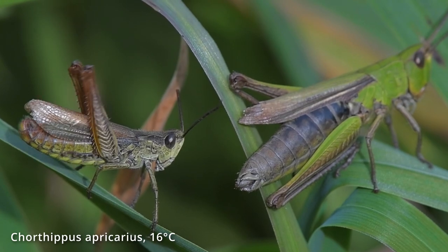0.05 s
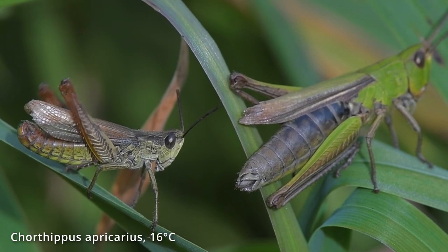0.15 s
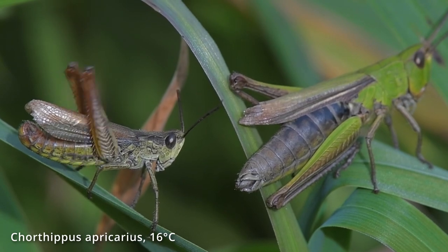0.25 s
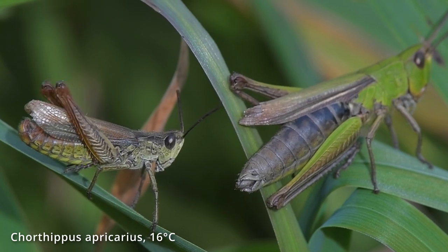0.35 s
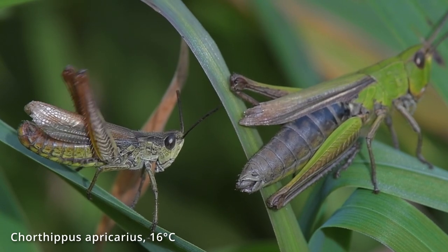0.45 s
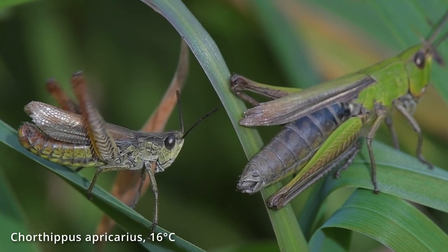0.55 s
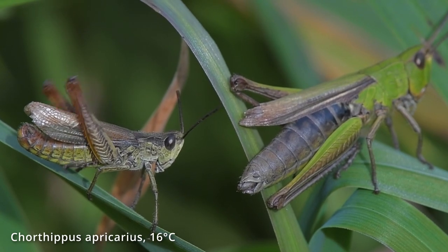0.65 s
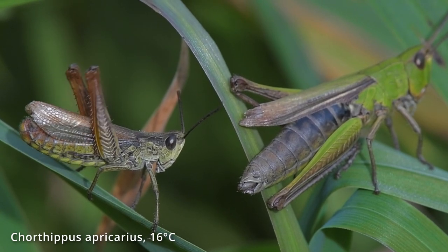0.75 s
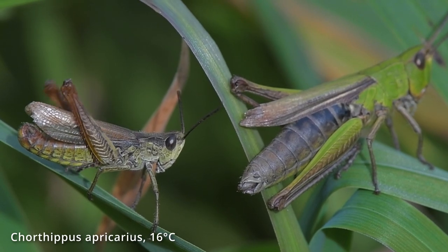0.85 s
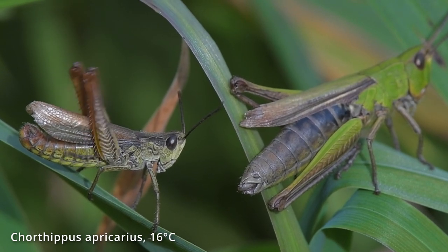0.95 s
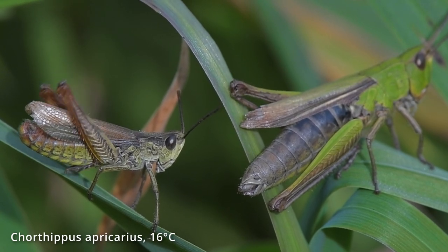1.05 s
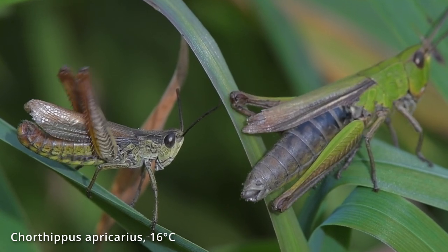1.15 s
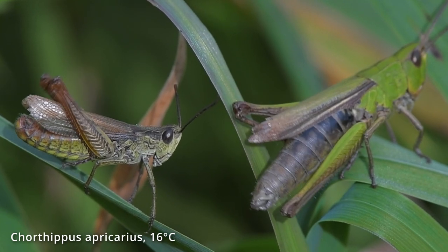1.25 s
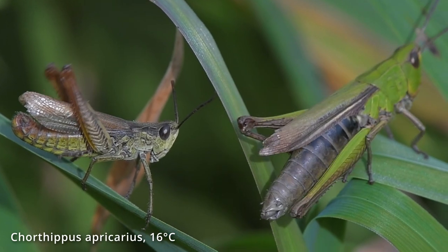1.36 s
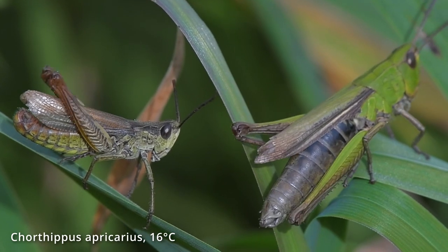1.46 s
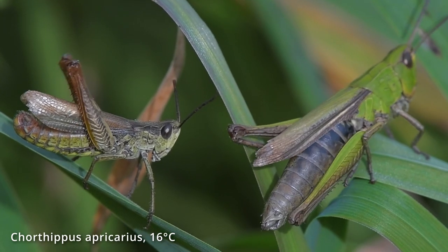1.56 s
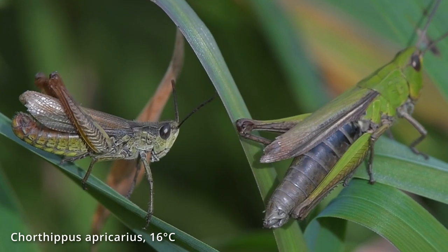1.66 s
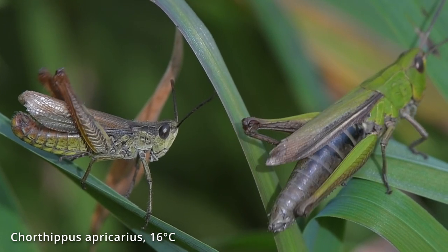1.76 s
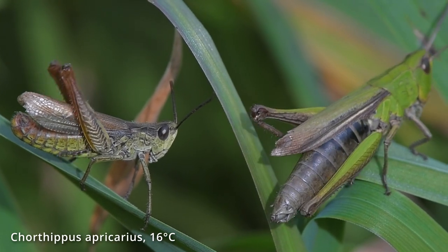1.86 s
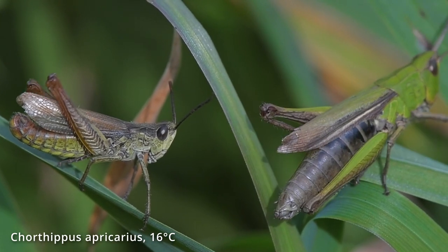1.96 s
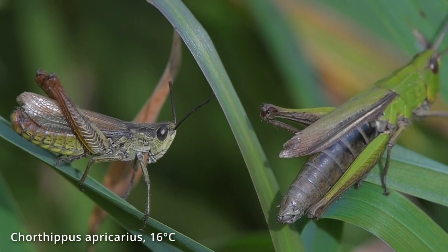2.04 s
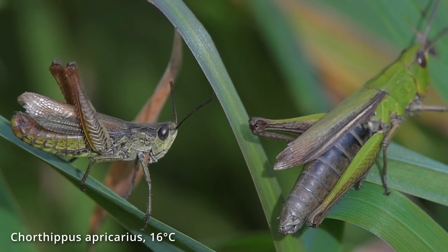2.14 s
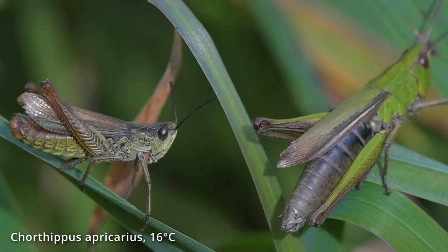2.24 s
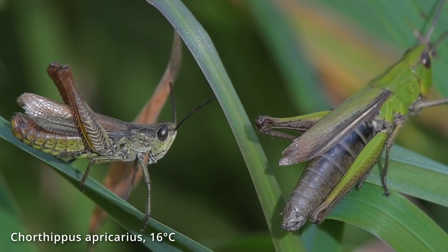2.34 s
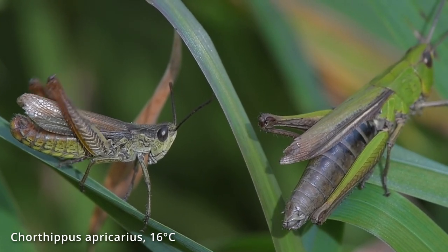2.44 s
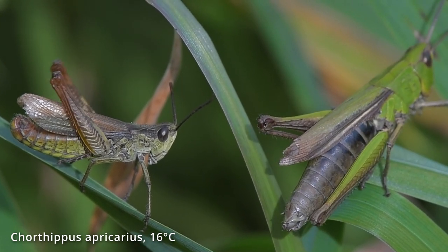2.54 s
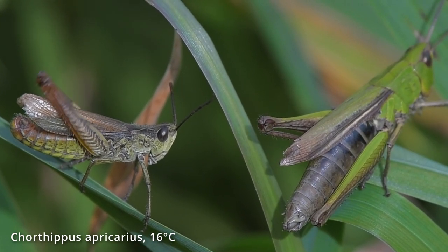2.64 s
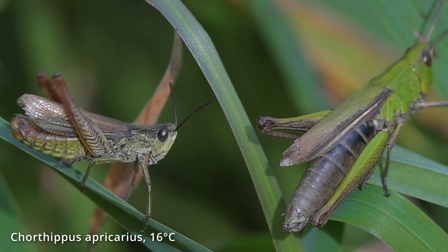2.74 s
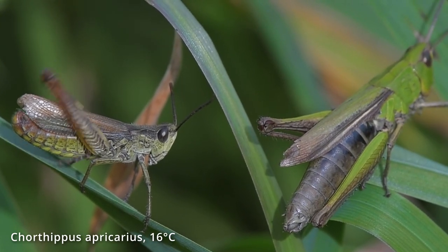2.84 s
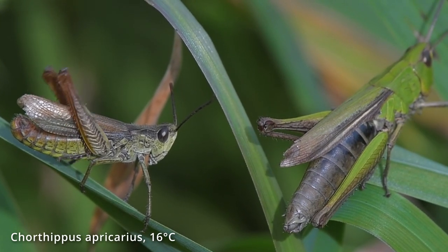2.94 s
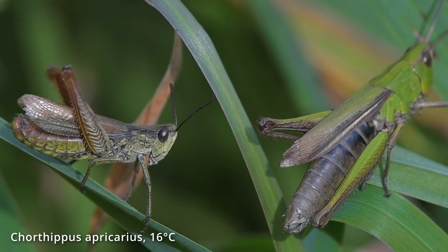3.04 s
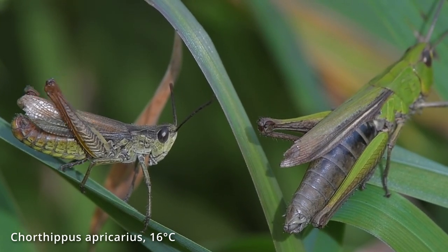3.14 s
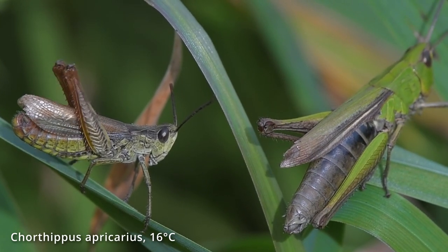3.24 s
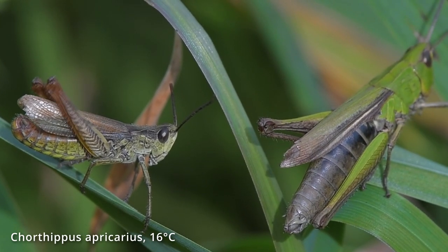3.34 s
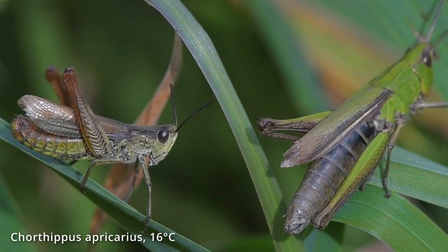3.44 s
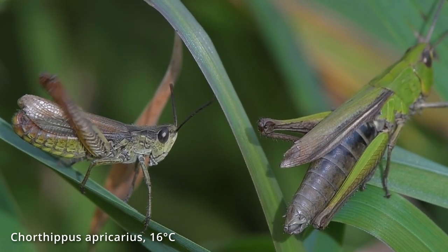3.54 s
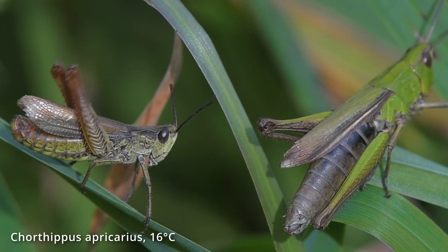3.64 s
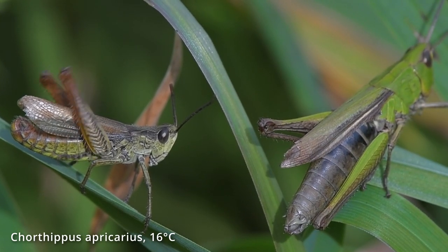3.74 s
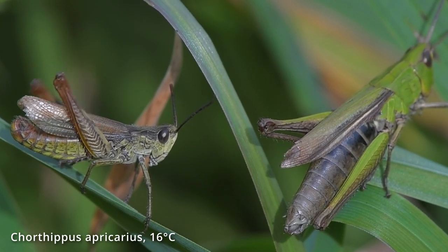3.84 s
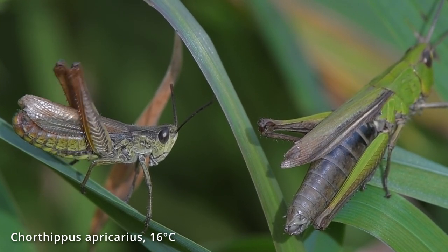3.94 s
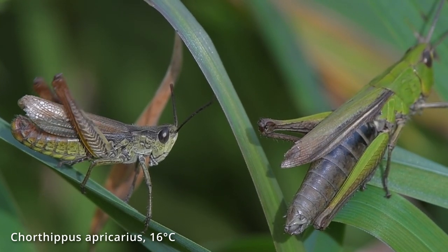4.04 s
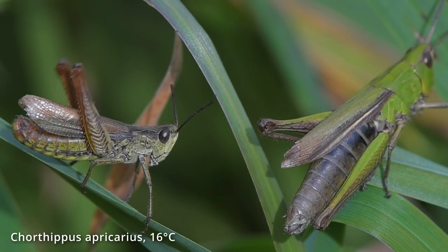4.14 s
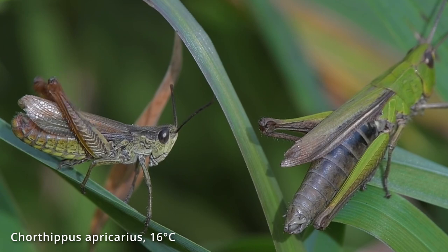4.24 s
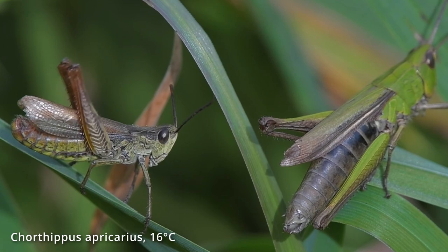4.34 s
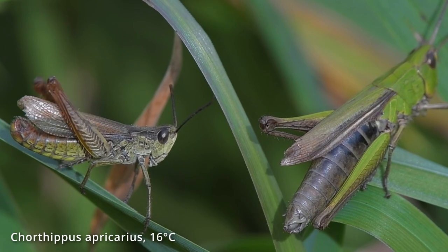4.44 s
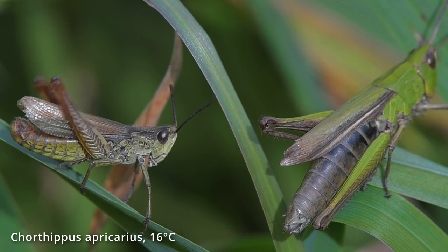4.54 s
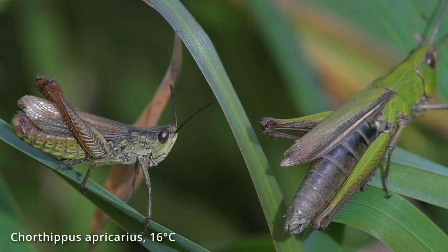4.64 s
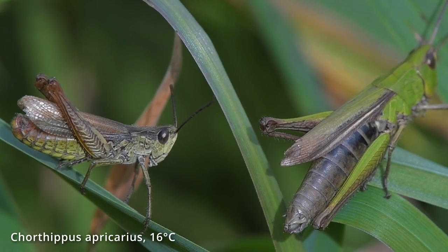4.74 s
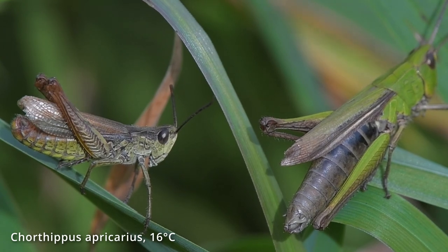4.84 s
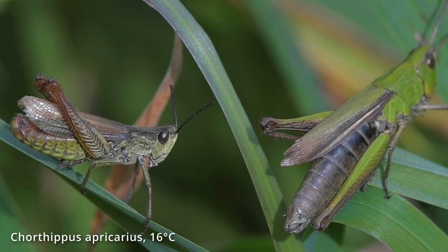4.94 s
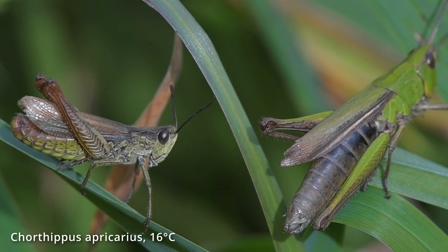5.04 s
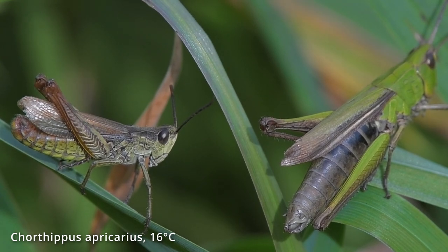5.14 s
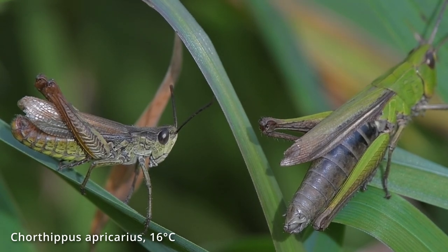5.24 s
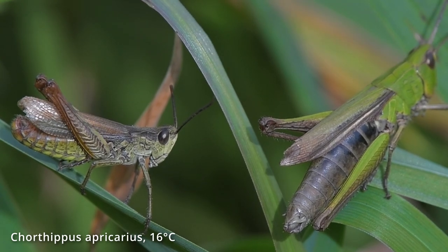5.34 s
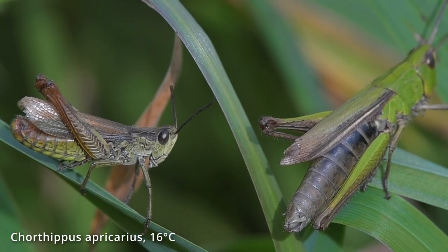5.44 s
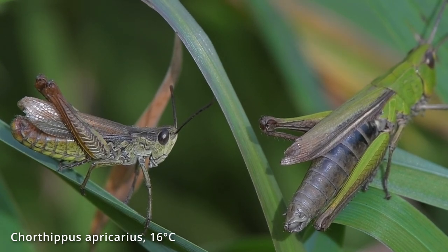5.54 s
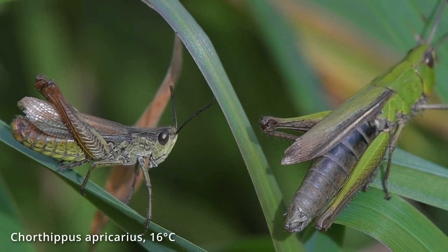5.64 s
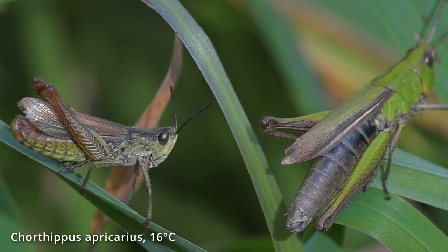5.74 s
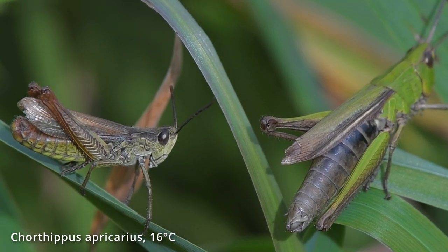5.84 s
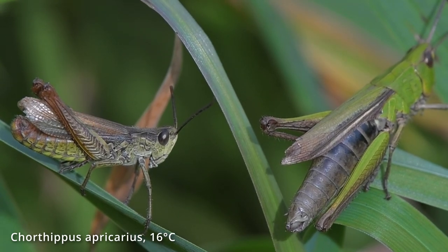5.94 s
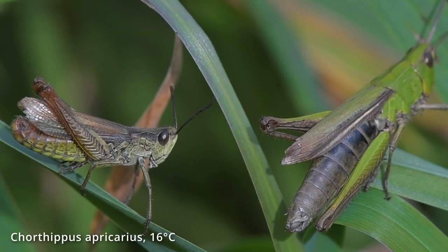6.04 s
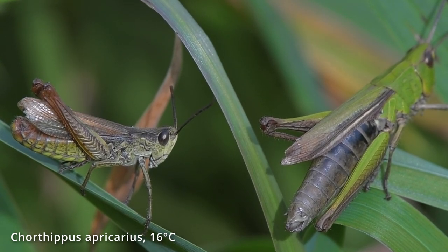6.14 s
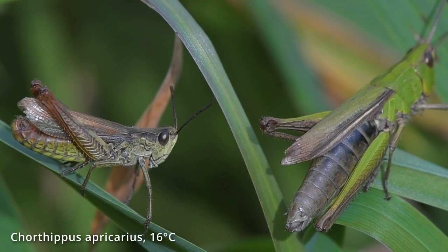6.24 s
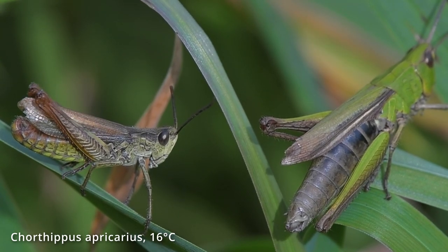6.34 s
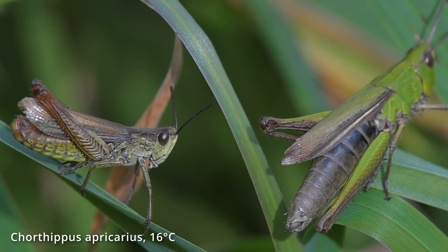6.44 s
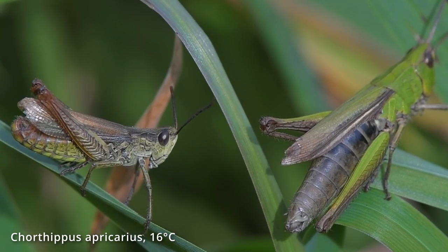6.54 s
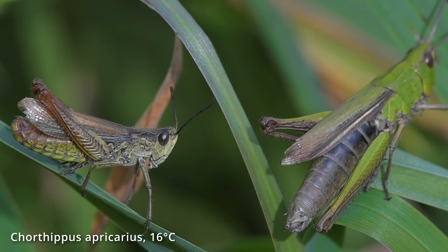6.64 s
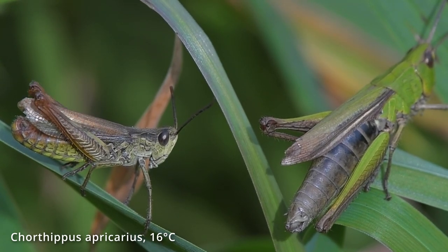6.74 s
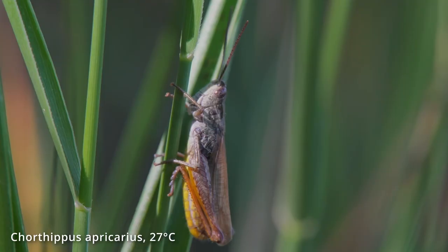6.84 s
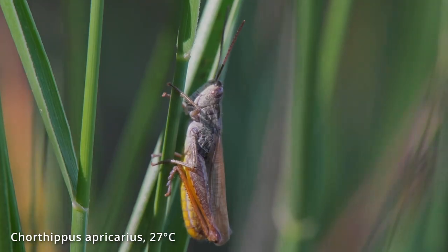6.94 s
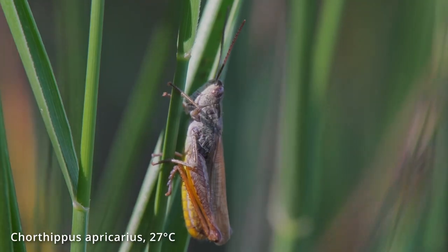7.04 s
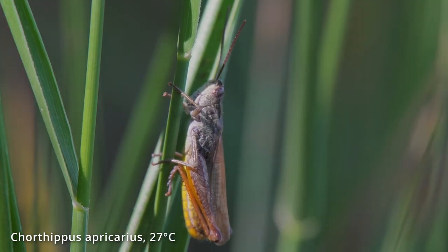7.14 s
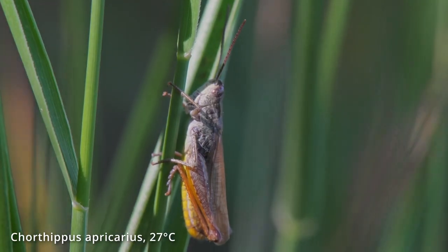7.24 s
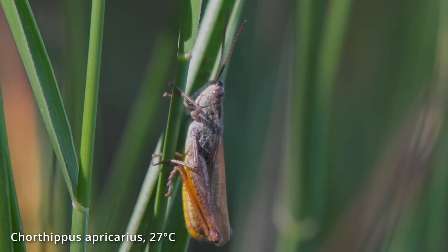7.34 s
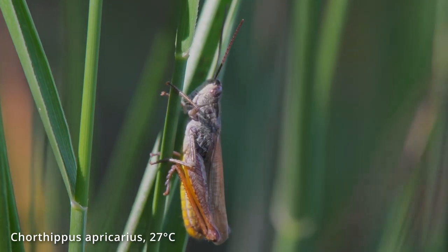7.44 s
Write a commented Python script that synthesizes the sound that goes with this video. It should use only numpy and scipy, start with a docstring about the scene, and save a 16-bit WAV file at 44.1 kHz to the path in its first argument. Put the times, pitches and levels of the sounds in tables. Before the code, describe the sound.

A grasshopper sings close to the microphone in a quiet meadow, rubbing its legs on its wings in a run of dry, high rasps, about three a second. After some four seconds the song ends in a brief scuffle of ticks on stems, followed by a few tiny rustles. Distant birds wheeze, chirp and twitter over a soft hush and a barely audible fly. Faint wind rumbles late, then the background turns quieter and hissier.

```python
"""A meadow, with a grasshopper singing close by: the peg rows of its hind legs rasp up and down the
wing veins and set the wings ringing. The song ends in a scuffle, with knocks on stems and rustles of
legs on grass. Behind it lie a soft hush, a fly's faint hum and far birds that wheeze, whistle, chirp
and twitter. Wind rumbles in late; near the end the background cuts to a quieter, hissier spot."""
import sys
import numpy as np
from scipy import signal
from scipy.fft import rfft, irfft, next_fast_len
from scipy.io import wavfile

SR = 44100
rng = np.random.default_rng(int(sys.argv[2]) if len(sys.argv) > 2 else 0)


def file_out(sig):
    """Save sig as 16-bit WAV at sys.argv[1]."""
    # one column per channel
    cols = np.atleast_2d(sig).T
    # limit, then scale
    lim = np.clip(cols, -1, 1)
    pcm = np.round(lim * 32767).astype(np.int16)
    wavfile.write(sys.argv[1], SR, pcm)


N = 330309
T = np.arange(N) / SR
CUT_S = 6.882

# Resonances of wing ring, body, lower and upper rasp: pitch_hz, width_hz, relative_db
RING_MODES = [(5960, 410, -11), (6740, 597, 6.5), (7640, 610, 4), (8390, 590, -6.5)]
BODY_MODES = [(4600, 430, -3), (5700, 670, 5)]
LOWER_RASP_MODES = [(8470, 946, 0.16), (9750, 300, 2.1), (10790, 890, -4)]
UPPER_RASP_MODES = [(12210, 2050, 2.24), (13200, 2140, 2.2), (14910, 860, 2)]
# Faster strokes are louder: rasp_db, pegs_per_s
PEG_RATES = [(-60, 450), (-44.5, 1000), (-25, 2200)]

# The song runs lift, sweep, lift, press, snap. Level triples are offsets at a stroke's start, turn and
# end. Tilt is lower rasp over upper rasp; its pairs are start and end.
# Lifts, the leg swings up, swelling and brightening: start_s, rise_ms, fall_ms, rasp_db, ring_db
LIFTS = [(0.1598, 20.9, 7, -25.5, -49), (0.311, 23, 4.7, -25, -45), (0.5109, 17.7, 9.9, -29.5, -49.5),
         (0.664, 25.7, 4.2, -28, -44.5), (0.8629, 16.6, 9.2, -33, -45.5), (1.0224, 19.3, 6.5, -27, -43),
         (1.2043, 20.5, 7.5, -36.5, -54), (1.6242, 16.5, 12.4, -39.5, -59), (1.7721, 28.4, 9.4, -25.5, -56),
         (1.9492, 10.8, 12, -38.5, -57), (2.221, 26.9, 3, -45.5, -69), (2.443, 17, 7.7, -34.5, -63.5),
         (2.6026, 20.7, 3, -33.5, -58), (2.7557, 24.4, 10.2, -29, -53), (2.9788, 20.2, 2.45, -37.5, -56),
         (3.1237, 26.2, 6.4, -24, -57), (3.3298, 9.1, 15.2, -50, -54), (3.4794, 15.0, 11.9, -37, -52),
         (3.6929, 16.4, 7, -32, -51), (3.8443, 23.7, 9.2, -22, -45.5), (4.0438, 28.6, 1.47, -27, -55),
         (4.201, 20.3, 8, -23.5, -44.5), (4.5563, 18, 5.6, -27, -48.5)]
LIFT_START_DB, LIFT_START_SHARE, LIFT_END_DB = -47, .37, -6   # start = base + share of the peak
LIFT_RING_DB, LIFT_TILT_DB = (0, -5, -15), (5.5, -13.5)
# Sweeps, the leg comes slowly down, dulls and drags on:
# start_s, rise_ms, fall_ms, rasp_db, ring_delay_ms, ring_db, drag_db
SWEEPS = [(0.1927, 3.84, 68, -27, 12, -39, -50.5), (0.5437, 1.7, 65, -28.5, 6.2, -36, -46.5),
          (0.8976, 1.68, 62.5, -28.5, 5.55, -35.5, -50), (1.6577, 15.2, 36.7, -37, 22.4, -45, -59.5),
          (1.8252, 16.6, 27, -23, 13.3, -31.5, -63.5), (2.4789, 8.9, 50, -35.5, 35.4, -44, -64.5),
          (2.636, 16.9, 50, -31, 20.4, -38.5, -65), (3.0113, 12, 39, -41.5, 23.7, -44.5, -55.5),
          (3.3572, 4.7, 57, -38.5, 5.1, -39, -56), (3.728, 3, 59, -32, 27.4, -41, -53),
          (4.0818, 1.29, 56, -32.5, 15.9, -39.5, -53.5), (4.4463, 5.0, 48, -26, 9.7, -32.5, -59)]
SWEEP_START_DB, SWEEP_END_DB, SWEEP_RING_START_DB, SWEEP_TILT_DB = -7, -63.5, -10, (-9, 12)
# Presses, a bright even rub at the top of the swing: start_s, rise_ms, hold_ms, rasp_db
PRESSES = [(0.3449, 4.15, 22.9, -29), (0.7001, 2.94, 26.3, -30), (1.055, 3.7, 17.2, -31.5),
           (1.2399, 15, 9.8, -34.5), (1.814, 3.03, 7.7, -36.5), (1.978, 2.6, 16.6, -37.5),
           (2.2546, 10.7, 20, -38), (2.797, 9.1, 31.2, -33.5), (3.1654, 4.4, 23.8, -31),
           (3.511, 2.8, 33.3, -32), (3.8837, 7, 19.2, -29), (4.2373, 2.16, 29.4, -30.5),
           (4.5875, 8.9, 17.8, -31.5)]
PRESS_RASP_DB, PRESS_RING_DB, PRESS_TILT_DB = (-10.5, 0, -7), (-37, -39, -29), (-10.5, -9.5)
# Snaps, the leg slams down: start_s, hold_ms, start_rasp_db, turn_rasp_db, ring_db
SNAPS = [(0.024, 9.1, -17.5, -21.5, -18), (0.3792, 13.4, -16, -24, -25), (0.7332, 11, -19, -20.5, -18.5),
         (1.0824, 7.4, -19, -19.5, -25.5), (1.2884, 5.54, -25, -16.5, -22),
         (1.4966, 3.73, -33.5, -20.5, -22.5), (2.0933, 3.77, -22, -21, -21), (2.318, 6.7, -26, -21.5, -29),
         (2.847, 9.8, -26.5, -19, -26.5), (3.2011, 6.7, -21, -18, -26.5), (3.5558, 5.55, -20.5, -19.5, -18),
         (3.9204, 9.6, -19, -18, -20), (4.2765, 9, -18, -19.5, -21)]
SNAP_FALL_DB_PER_MS, SNAP_END_DB, SNAP_TILT_DB = 1.38, -57, (-2, .5)
SNAP_RING_START_DB, SNAP_RING_END_DB = -9.5, -54
# Stray rubs and the closing scuffle: start_s, rise_ms, fall_ms, rasp_db, ring_db, tilt_db
SCRAPES = [(0.0, 4, 5.3, -33, -45, -1), (0.01, 2.42, 1.6, -32, -46, -1.5),
           (1.266, 7.9, 10.3, -39.5, -51, -2), (1.46, 22, 8, -58, -56.5, 6),
           (2.0125, 1.82, 21, -45.5, -52, -2), (2.034, 6.9, 10.5, -49, -55, 1),
           (2.0538, 2.67, 3.5, -48, -50, 0), (2.0706, 3.76, 1.2, -51, -50, 10),
           (2.2904, 7.4, 1.9, -35, -51, -3), (2.304, 3.5, 8, -52, -70, -2.5),
           (3.1963, 1.2, 1.5, -30, -55, -3), (4.3436, 7.7, 8.1, -29.5, -24, 10),
           (4.364, 2.34, 18.6, -39, -36.5, 14), (4.387, 3.1, 11, -41.5, -43.5, 12.5),
           (4.4029, 1.5, 4, -38, -39, 12), (4.4088, 5.3, 25, -21, -39, 7.5),
           (4.4932, 1.28, 28, -43.5, -45.5, 9), (4.527, 3.8, 25, -57, -55, 12),
           (4.6199, 1.45, 17, -36.5, -46.5, -2)]
SCRAPE_RASP_DB, SCRAPE_RING_DB = (-6, 0, -7), (-8.5, 1.5, -3)

# Colour of the meadow hush: frequency_hz, relative_db
MEADOW_COLOUR = [(15, -59.5), (25, -27.5), (87, -13), (170, -10.5), (206, -3.5), (263, -9), (440, -3.5),
                 (520, -8), (1000, -10.5), (1900, -16.5), (3300, -17.5), (5000, -20.5), (8000, -20),
                 (16000, -19.5)]
# Its stereo width: frequency_hz, side_over_mid_db
MEADOW_WIDTH = [(60, -5), (180, -13.5), (550, -15.5), (1650, -12), (4970, -4.5), (15000, 2)]
# Its slow swell: time_s, gain_db
MEADOW_SWELL = [(0.0, -1), (6.88, 0.5)]
# A fly on the wing: time_s, pitch_hz, level_db
FLY_PATH = [(0, 410, -82.5), (1.1, 413.4, -78), (1.4, 405, -83.5), (2.4, 410.6, -83), (4.1, 409.7, -80),
            (4.2, 447.4, -85), (4.25, 456.3, -72.5), (4.44, 441, -79.5), (4.76, 462, -74.5),
            (5.78, 443.2, -76), (5.93, 459.4, -71.5), (6.42, 446.7, -76), (6.45, 460, -81.5)]
# A far bird's wheezy rising calls: start_s, level_db, stretch_ratio
WHEEZES = [(-0.14, -65.5, 1.1), (0.743, -64, 1.07), (1.89, -66.5, .98), (2.81, -64, .85),
           (3.71, -64.5, 1.03), (4.639, -67, 1.01), (5.519, -65, 0.94), (6.339, -65, 1.05)]
# One wheeze before stretching: offset_s, pitch_hz, relative_db, trill_depth_hz
WHEEZE_SHAPE = [(0, 3709, -15.5, 30), (.04, 3780, -2, 78.8), (.1, 4080, -4, 160.8),
                (0.148, 4250, -1.5, 161.3), (.22, 4120, -11.5, 198.3), (.32, 4145, -16, 200.8),
                (.52, 4140, -21.5, 199.9)]
# Clear bird notes: start_s, rise_ms, fall_ms, start_hz, end_hz, level_db
BIRD_NOTES = [(0.2, 38, 86, 4300, 4290, -61.5), (0.415, 24.3, 40, 4490, 4350, -62.5),
              (0.485, 35, 170, 4400, 4450, -73), (3.52, 30, 40, 3200, 3200, -70),
              (6.15, 58, 90, 5200, 5200, -81), (6.915, 18, 20, 4600, 4600, -81),
              (7.0, 50, 50, 3300, 3300, -86), (7.12, 30, 22, 3280, 3480, -81),
              (7.3, 28, 25, 3200, 2750, -76)]
# Rising chirps: start_s, climb_ms, top_hz, level_db
CHIRPS = [(1.027, 30.5, 5113, -44), (5.055, 46, 5266, -51), (6.371, 38, 5144, -49.5)]
# One chirp: climb_share, offset_from_top_hz, relative_db
CHIRP_SHAPE = [(0, -1000, -12), (.25, -500, -3.5), (.6, -150, -0.5), (1.02, 5, 0.5), (1.45, -200, -22)]
# Knocks on stems: start_s, peak_db, pitch_hz, t60_s
STEM_KNOCKS = [(0.2543, -46.5, 1470, 0.016), (4.349, -35, 4517, 0.018), (4.3584, -31.5, 3497, 0.011),
               (4.3893, -32.5, 4140, 0.012), (4.4038, -37, 3510, 0.039), (4.413, -25.5, 4030, 0.017),
               (4.4198, -33, 3500, 0.012), (4.497, -46, 4600, .03)]
# Swell of the far twitter: time_s, level_db
TWITTER_SWELL = [(3.301, -84), (3.85, -83), (4.359, -75.5), (4.92, -73), (6.47, -87), (6.879, -90)]
# Its colour: frequency_hz, relative_db
TWITTER_COLOUR = [(1800, -28.5), (2500, -1), (3000, -4), (3500, -.5), (4500, -21.5)]
# Gusts of wind: time_s, level_db
GUSTS = [(4.599, -85), (5.001, -85.5), (5.42, -79.5), (5.498, -71), (5.71, -66), (6.12, -73.5),
         (6.219, -59), (6.339, -67), (6.4, -76.5), (6.72, -80), (6.819, -69.5), (6.881, -61.5)]
# Their colour: frequency_hz, relative_db
WIND_COLOUR = [(15, -53), (25, -16), (86, -4), (134, 4.5), (150, -0.5), (260, -17), (340, -40), (570, -120)]
# Their stereo width: frequency_hz, side_over_mid_db
WIND_WIDTH = [(30, -16), (200, -34)]
# Legs rustling on grass: time_s, level_db, fall_ms
RUSTLES = [(4.66, -39.5, 13), (5.9119, -50, 20), (5.9417, -46.5, 23), (5.9907, -45.5, 30), (6.2, -60, 15.5),
           (6.419, -52, 14), (6.443, -49.5, 15.6), (6.539, -64, 12), (6.6706, -59, 11.6)]
# Their colour: frequency_hz, relative_db
RUSTLE_COLOUR = [(2940, -45), (5000, -17), (5790, -15), (8620, -3), (14800, -8), (16000, -1)]
# Colour of the quieter spot: frequency_hz, relative_db
QUIET_COLOUR = [(15, -59), (25, -27.5), (92, -16), (153, -18), (175, -11.5), (277, -6.5), (384, -16),
                (2220, -29), (2910, -27.5), (3920, -30.5), (6560, -25), (8360, -14.5), (16000, -16)]
# Its stereo width: frequency_hz, side_over_mid_db
QUIET_WIDTH = [(60, -14.5), (180, -26), (550, -12.5), (1650, -6), (4970, -6), (15000, 0)]


def amp(db):
    """dB to gain."""
    return 10 ** (np.asarray(db) / 20)


def envelope(outlines, lead_s=.00066, tail_s=.001, fade_db=25):
    """Gain from (times_s, levels_db) outlines with faded edges; in an overlap the louder wins."""
    gain = np.zeros(N)
    for s, db in outlines:
        s = np.r_[s[0] - lead_s, s, s[-1] + tail_s]
        db = np.r_[db[0] - fade_db, db, db[-1] - fade_db]
        span = slice(max(int(s[0] * SR), 0), int(s[-1] * SR))
        gain[span] = np.maximum(gain[span], amp(np.interp(T[span], s, db)))
    return gain


def wander(rate_hz):
    """Smooth random drift, rms 1."""
    pole = np.exp(-2 * np.pi * rate_hz / SR)
    drift = signal.lfilter([1], [1, -2 * pole, pole * pole], rng.standard_normal(N + SR))[SR:]
    return drift / np.sqrt(np.mean(drift ** 2) + 1e-20)


def noise_bed(colour, width=((1, -99), (2, -99))):
    """Stereo noise of a given colour and width, mono by default; mid rms 1."""
    size = next_fast_len(N)
    log_hz = np.log(np.fft.rfftfreq(size, 1 / SR) + 1)
    mid_db, side_db = (np.interp(log_hz, np.log(hz), db) for hz, db in (zip(*colour), zip(*width)))
    white = rfft(rng.standard_normal((2, size)))
    mid, side = irfft(white * amp([mid_db, mid_db + side_db]), size)[:, :N]
    return np.array([mid + side, mid - side]) / np.std(mid)


def tone(path, waver_hz, flutter_db, flutter_hz):
    """A sine along (time_s, pitch_hz, level_db) points, with wavering pitch and fluttering level."""
    s, hz, db = np.transpose(path)
    phase = 2 * np.pi * np.cumsum(np.interp(T, s, hz) + waver_hz) / SR
    flutter = amp(flutter_db * wander(flutter_hz))
    return np.sqrt(2) * envelope([(s, db)], lead_s=.01, tail_s=.01) * flutter * np.sin(phase)


def phrase(notes):
    """Join notes into one tone path, with silence around each."""
    return np.vstack([[(note[0][0] - .004, note[0][1], -110), *note,
                       (note[-1][0] + .004, note[-1][1], -110)] for note in notes])


def echoes(dry, t60_s, mid_db, side_db):
    """Direct sound plus a dying tail of reflections, partly different at the two ears."""
    tail = rng.standard_normal((2, SR // 4)) * amp(-60 * T[:SR // 4] / t60_s)
    mid, side = signal.oaconvolve(dry[None], tail / np.linalg.norm(tail[0]), axes=1)[:, :N]
    return dry + amp(mid_db) * mid + amp(side_db) * side * [[1], [-1]]


def leg_strokes():
    """All strokes in order, as columns: times_s, rasp_db, ring_db (start, turn, end) and tilt_db."""
    rows = [(s, rise, fall, (LIFT_START_DB + LIFT_START_SHARE * db, db, db + LIFT_END_DB),
             np.add(ring, LIFT_RING_DB), LIFT_TILT_DB) for s, rise, fall, db, ring in LIFTS]
    rows += [(s, rise, fall, (db + SWEEP_START_DB, db, SWEEP_END_DB),
              (drag + SWEEP_RING_START_DB, drag, drag), SWEEP_TILT_DB)
             for s, rise, fall, db, _, _, drag in SWEEPS]
    rows += [(s, rise, hold, np.add(db, PRESS_RASP_DB), np.add(db, PRESS_RING_DB), PRESS_TILT_DB)
             for s, rise, hold, db in PRESSES]
    rows += [(s, hold, (db - SNAP_END_DB) / SNAP_FALL_DB_PER_MS, (attack, db, SNAP_END_DB),
              (attack + SNAP_RING_START_DB, ring, SNAP_RING_END_DB), SNAP_TILT_DB)
             for s, hold, attack, db, ring in SNAPS]
    rows += [(s, rise, fall, np.add(db, SCRAPE_RASP_DB), np.add(ring, SCRAPE_RING_DB), (tilt, tilt))
             for s, rise, fall, db, ring, tilt in SCRAPES]
    rows.sort(key=lambda row: row[0])
    strokes = [(s + np.cumsum([0, rise, fall]) / 1000, *levels) for s, rise, fall, *levels in rows]
    return map(np.array, zip(*strokes))


def rasp_outline(times_s, levels_db, halfway_rise=.62, halfway_fall=.58):
    """One rub: a quick swell, the turn, a slowing fall; if it ends loud it drops at once."""
    start_s, turn_s, end_s = times_s
    start_db, turn_db, end_db = levels_db
    halt_db = -10 if end_db > -50 else 0
    return ([start_s, (start_s + turn_s) / 2, turn_s, (turn_s + end_s) / 2, end_s, end_s + .003],
            [start_db, start_db + halfway_rise * (turn_db - start_db), turn_db,
             turn_db + halfway_fall * (end_db - turn_db), end_db, end_db + halt_db])


def drag_outlines(climb_db_per_ms=2.2, sag_db_per_ms=.37):
    """The wing rings up as a sweep slows and goes on faintly while the leg creeps."""
    for s, rise, fall, _, delay, ring, drag in SWEEPS:
        end = rise + fall
        times_ms = np.array([0, delay, end, end + 15.44, end + 62])
        start_db = ring - climb_db_per_ms * delay
        end_db = ring - sag_db_per_ms * (end - delay)
        yield s + times_ms / 1000, [start_db, ring, end_db, drag, drag - 7]


def peg_clicks(rasp):
    """Pegs tick unevenly over the vein; louder strokes click faster, with less plain rubbing noise."""
    rasp_db = 20 * np.log10(rasp + 1e-9)
    pegs_per_s = np.interp(rasp_db, *np.transpose(PEG_RATES))
    pegs_passed = np.cumsum(pegs_per_s * amp(2.5 * wander(300))) / SR
    clicks = np.diff(np.floor(pegs_passed), prepend=0)
    clicks *= amp(rng.normal(0, .39, N)) * np.sqrt(SR / pegs_per_s)
    friction = np.interp(rasp_db, [-55, -30], [.75, .45])
    return np.sqrt(1 - friction ** 2) * clicks + friction * rng.standard_normal(N)


def resonate(drive, modes, band_hz):
    """Wing or body modes in parallel, alternating in sign, inside a steep band-pass."""
    drive = np.vstack([drive + 1e-18, np.arange(N) == 0])   # the added impulse sets unity noise gain
    ringing = 0
    for k, (hz, width_hz, db) in enumerate(modes):
        radius = np.exp(-np.pi * width_hz / SR)
        poles = [1, -2 * radius * np.cos(2 * np.pi * hz / SR), radius * radius]
        ringing += (-1) ** k * amp(db) * signal.lfilter([1 - radius, 0, radius - 1], poles, drive)
    ringing = signal.sosfilt(signal.butter(5, band_hz, "band", fs=SR, output="sos"), ringing)
    return ringing[:-1] / np.linalg.norm(ringing[-1])


def grasshopper():
    """One train of peg clicks drives all wing resonances; slow rubbing rings low, fast rasps high."""
    times_s, rasp_db, ring_db, tilt_db = leg_strokes()
    rasp = envelope(map(rasp_outline, times_s, rasp_db), tail_s=.018)
    ring = envelope([*zip(times_s, ring_db), *drag_outlines()], tail_s=.019)
    # the leg creeps before a soft start, so the sound swells in ahead
    soft = rasp_db[:, 0] < -50
    ring = np.maximum(ring, envelope(zip(times_s[soft, :1], ring_db[soft, :1]), lead_s=.025))
    rasp = np.maximum(rasp, envelope(zip(times_s[soft, :1], rasp_db[soft, :1]), lead_s=.015))
    # faint unrelated noise through the same resonances, opposite at the two ears, slightly widens the song
    drive = np.array([peg_clicks(rasp), amp(-18) * rng.standard_normal(N)])
    # the rasp brightens as the leg swings up and dulls as it comes down
    tilt = amp(np.interp(T, times_s[:, ::2].ravel(), tilt_db.ravel()))
    upper_rasp = rasp / np.sqrt(1 + tilt ** 2)
    body = 1.74 * ring ** 2   # only hard rubbing shakes the body, lower in pitch
    mid, side = (resonate(drive * ring, RING_MODES, band_hz=(5420, 8900))
                 + resonate(drive * body, BODY_MODES, band_hz=(4100, 6600))
                 + resonate(drive * upper_rasp * tilt, LOWER_RASP_MODES, band_hz=(8220, 12480))
                 + resonate(drive * upper_rasp, UPPER_RASP_MODES, band_hz=(11840, 17000)))
    return echoes(mid, t60_s=.24, mid_db=-30, side_db=-28) + side * [[1], [-1]]


def meadow_hush():
    """A soft, broad bed of noise that swells very slightly."""
    swell_db = np.interp(T, *np.transpose(MEADOW_SWELL))
    return amp(-64.5 + swell_db) * noise_bed(MEADOW_COLOUR, MEADOW_WIDTH)


def fly():
    """Wingbeats hum as one faint, unsteady tone."""
    return tone(FLY_PATH, waver_hz=6 * wander(12), flutter_db=1.71, flutter_hz=12.08)


def bird_wheezes(trill_rate_hz=120):
    """A far bird's rising tone, trilled so fast that it blurs into a band."""
    offset_s, hz, shape_db, trill_depth_hz = np.transpose(WHEEZE_SHAPE)
    calls, depth_hz = [], 0
    for s, db, stretch in WHEEZES:
        times_s = s + offset_s * stretch
        calls.append(np.transpose([times_s, hz, db + shape_db]))
        depth_hz += np.interp(T, times_s, trill_depth_hz, left=0, right=0)
    trill_hz = depth_hz * np.sin(2 * np.pi * trill_rate_hz * T + wander(28.02))
    return tone(phrase(calls), waver_hz=trill_hz + 80 * wander(151), flutter_db=3.9, flutter_hz=204)


def bird_notes():
    """Clear whistles that hold or glide evenly as they swell and fade, and quick rising chirps."""
    notes = []
    for s, rise, fall, start_hz, end_hz, db in BIRD_NOTES:
        turn_hz = start_hz + (end_hz - start_hz) * rise / (rise + fall)
        notes.append([(s, start_hz, db - 11), (s + rise / 1000, turn_hz, db),
                      (s + (rise + fall) / 1000, end_hz, db - 18.5)])
    for s, climb_ms, top_hz, db in CHIRPS:
        notes.append([(s + share * climb_ms / 1000, top_hz + bend_hz, db + shape_db)
                      for share, bend_hz, shape_db in CHIRP_SHAPE])
    return tone(phrase(sorted(notes)), waver_hz=60 * wander(150), flutter_db=3.5, flutter_hz=150.05)


def stem_knocks():
    """Each knock on a stem is a click and a dying puff of noise, about an octave wide."""
    track, t = np.zeros(N), T[:SR // 20]
    for s, db, hz, t60_s in STEM_KNOCKS:
        hit = (t == 0) + rng.standard_normal(len(t)) * amp(-60 * t / t60_s)
        band = signal.butter(3, [hz / 1.14, hz * 1.65], "band", fs=SR, output="sos")
        knock = signal.sosfilt(band, hit)
        start = int(s * SR)
        track[start:start + len(t)] += amp(db) * knock / abs(knock).max()
    return track


def far_twitter():
    """Birds blurred by distance into a flickering band of noise."""
    flicker = amp(2.97 * wander(19))
    return envelope([np.transpose(TWITTER_SWELL)]) * flicker * noise_bed(TWITTER_COLOUR, MEADOW_WIDTH)


def wind():
    """Gusts buffet the microphone with a low, uneven rumble."""
    buffeting = amp(2 * wander(16))
    return envelope([np.transpose(GUSTS)]) * buffeting * noise_bed(WIND_COLOUR, WIND_WIDTH)


def leg_rustles():
    """Legs brush the grass in brief puffs of bright noise."""
    puffs = [([s - .003, s, s + ms / 1000], [db - 22, db - 12, db - 20]) for s, db, ms in RUSTLES]
    return envelope(puffs) * noise_bed(RUSTLE_COLOUR)[0]


def quiet_spot():
    """A steady bed with thinner mids and more hiss."""
    return amp(-63) * noise_bed(QUIET_COLOUR, QUIET_WIDTH)


def scene():
    """The singer close and almost dry, birds washed by distance, over a background that cuts once."""
    near = grasshopper() + echoes(stem_knocks() + leg_rustles(), t60_s=.04, mid_db=-12, side_db=-20)
    wheezes = echoes(bird_wheezes(), t60_s=.8, mid_db=1.5, side_db=-28)
    notes = echoes(bird_notes(), t60_s=.06, mid_db=-10, side_db=-21)
    background = np.where(T < CUT_S, meadow_hush() + far_twitter() + wind(), quiet_spot())
    return near + fly() + wheezes + notes + background


def record(dry):
    """The top falls away near 16 kHz, then is cut steeply."""
    softened = signal.sosfilt(signal.cheby2(8, 22, 16150, fs=SR, output="sos"), dry)
    return signal.sosfilt(signal.cheby2(12, 60, 16900, fs=SR, output="sos"), softened)


dry = scene()
out = record(dry)
file_out(out)
```